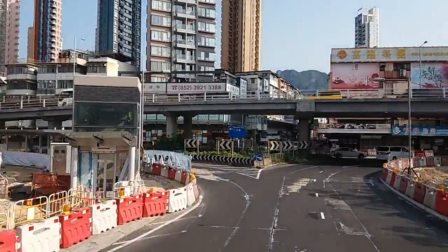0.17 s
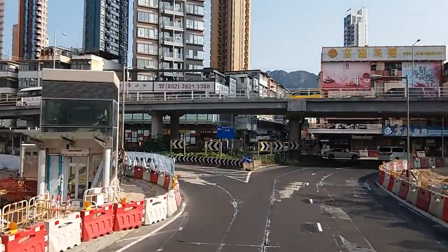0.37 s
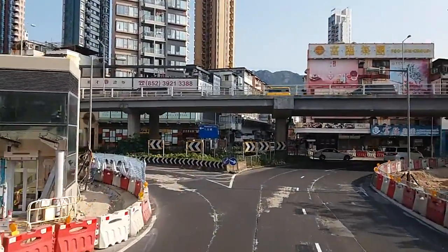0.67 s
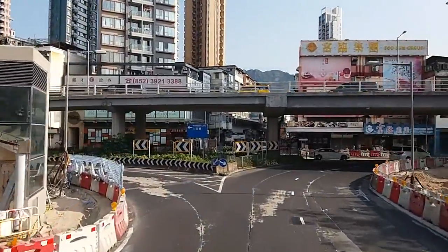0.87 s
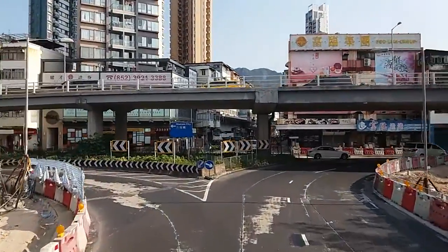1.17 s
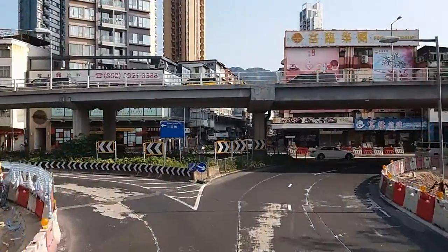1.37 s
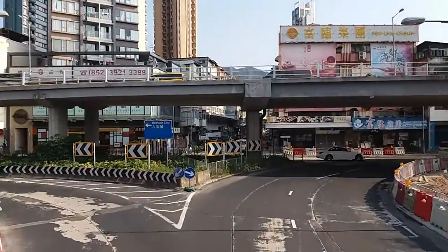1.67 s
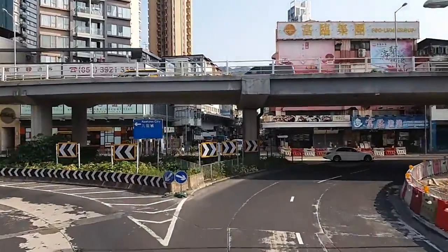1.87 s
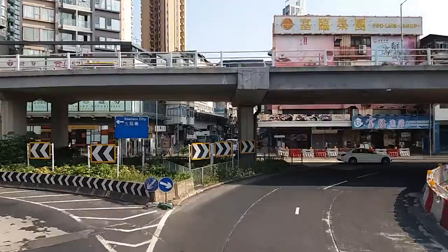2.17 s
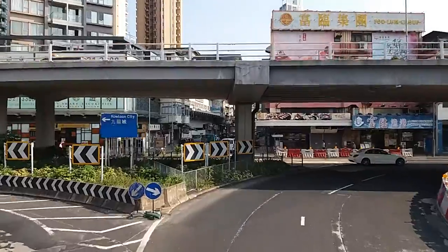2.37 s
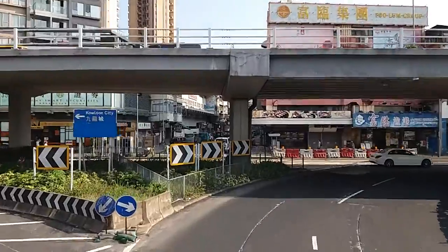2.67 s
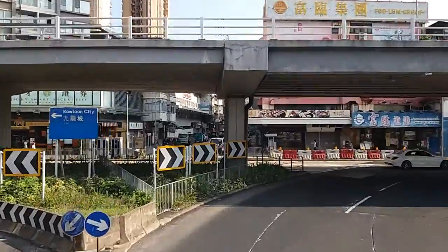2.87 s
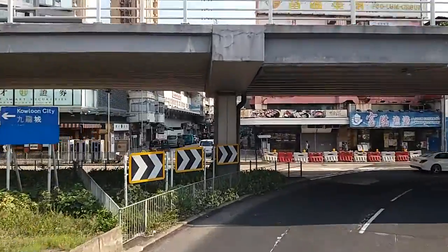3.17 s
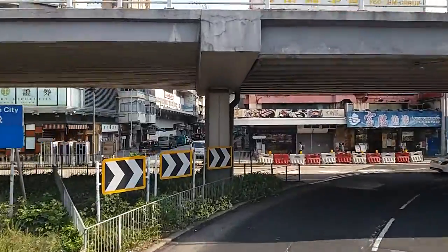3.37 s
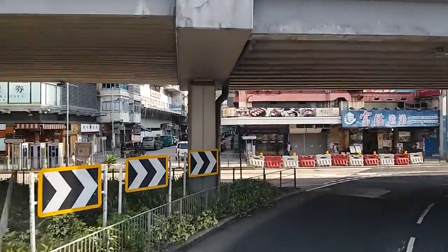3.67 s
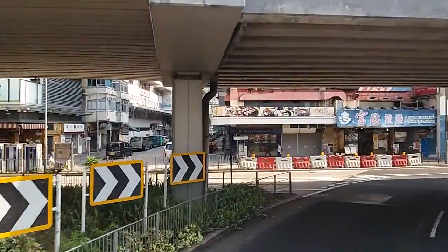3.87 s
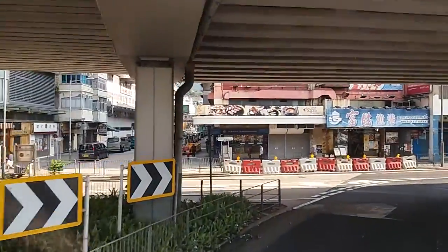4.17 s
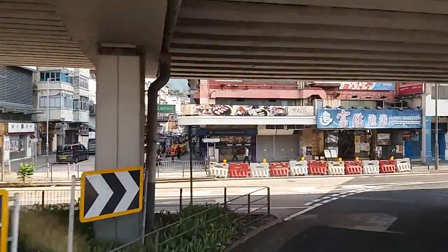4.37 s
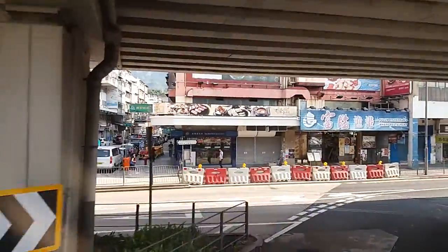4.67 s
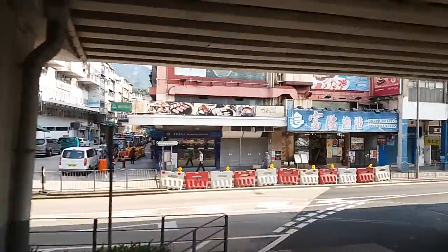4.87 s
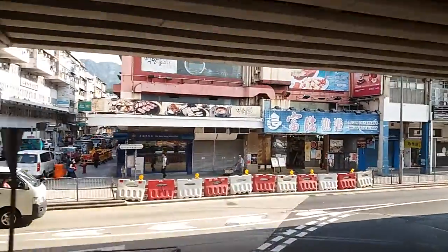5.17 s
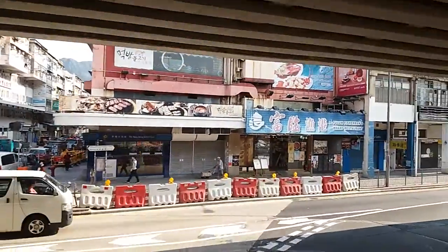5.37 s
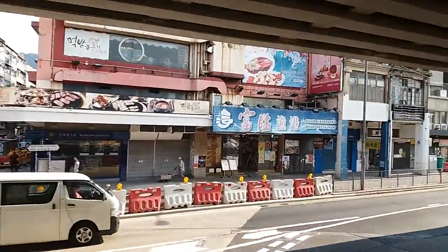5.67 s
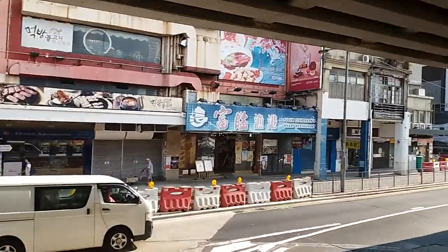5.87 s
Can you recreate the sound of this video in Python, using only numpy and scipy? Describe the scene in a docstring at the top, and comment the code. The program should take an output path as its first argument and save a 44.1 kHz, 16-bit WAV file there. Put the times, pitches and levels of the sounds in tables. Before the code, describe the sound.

Interior of a large bus on an uneven city road, in close, wide stereo. From 0 s a deep engine boom, tyre thrum, rumble and a low steady gear whine fill the cabin, with buzzing trim and faint air hiss. Floor thuds land at about 0.1 and 0.3-0.5 s, a heavy one near 1 s and another at 1.55 s, setting a side panel humming. The boom fades by 1.8 s; a sharp tick snaps at 2.0 s. Around 2.8 s a brief high rubbery squeak. The whine climbs from 3.2 to 4.15 s, then slides down to the end, swelling near 5.2 s. Thuds at 3.6, 4.1 and 4.5 s, a tick at 3.9 s. From 4.7 s fittings clack more densely, with crisp ticks at 4.9, 5.1 and 5.9 s and hard metallic raps at 5.65 and 5.8 s. The rumble continues to 6 s.

```python
"""The upper deck of a large bus in a city, heard through two microphone ports.
Shaped noise makes the road's thrum, rumble and drone, the buzz of the trim and the hiss of the air vents.
Drifting sine waves make the engine boom, the gear whine and a humming side panel.
Resonances struck by short bursts make the floor thuds and the clacks of loose fittings; fading sine waves
make the ticks of a clip and the rings of a bracket. One joint squeaks once, as noise through resonances."""
import sys
import numpy as np
from scipy import signal
from scipy.fft import rfft, irfft, next_fast_len
from scipy.io import wavfile
from scipy.ndimage import uniform_filter1d, minimum_filter1d, map_coordinates

SR = 44100
rng = np.random.default_rng(int(sys.argv[2]) if len(sys.argv) > 2 else 0)


def to_wav(s):
    """Save 16-bit WAV."""
    ch = np.atleast_2d(s).T  # columns
    pcm = np.round(np.clip(ch, -1, 1) * 32767)  # PCM
    wavfile.write(sys.argv[1], SR, pcm.astype(np.int16))


N = 265217  # length in samples, about 6 s

# gear teeth meshing: (time [s], pitch [Hz], level [dB])
MESH = [(0, 216.9, -28), (.3, 217, -29), (.6, 217.3, -31.5), (1.2, 220.2, -29.5), (2, 217, -32.5),
        (2.55, 211.1, -26), (2.9, 210.7, -27), (3.17, 216.7, -28.5), (3.4, 230, -22.5),
        (3.57, 241.4, -35.5), (3.68, 244, -25.5), (3.76, 248, -32.5), (3.83, 253.2, -45),
        (3.98, 260.3, -38.5), (4.15, 265, -33.5), (4.45, 261.5, -28.5), (4.6, 256.7, -43.5),
        (4.8, 255.3, -37), (4.86, 250.8, -25), (4.97, 250, -33.5), (5.21, 244.4, -21), (5.45, 239.2, -29),
        (5.75, 234.1, -27.5), (6.02, 227.6, -23.5)]
# resonances of the floor panels: (pitch [Hz], width [Hz], level [dB])
FLOOR_MODES = [(208, 99, -15.5), (254, 46, -0.5), (365, 21.6, 2), (442.5, 26, 1), (519.6, 20, 2),
               (645, 37, 0.5), (867, 244, -6), (1080, 300, -11.5)]


def amp(db):
    """Turn decibels into a plain multiplier."""
    return 10 ** (np.asarray(db) / 20)


def unit(x):
    """Scale a signal to an rms of 1."""
    return x / np.sqrt(np.mean(x ** 2) + 1e-20)


def along(points, hz):
    """Read values between (frequency [Hz], value) points on a log frequency axis."""
    f, v = np.transpose(points)
    return np.interp(np.log(hz + 1), np.log(f + 1), v)


def curves(rows):
    """One value per sample for each column after the time."""
    s, *cols = np.transpose(rows)
    return [np.interp(np.arange(N) / SR, s, c) for c in cols]


def during(rows, fade):
    """1 between the first and last row, fading to 0 outside over fade seconds."""
    start, end = rows[0][0], rows[-1][0]
    return np.interp(np.arange(N) / SR, [start - fade, start, end, end + fade], [0, 1, 1, 0])


def wobble(rate):
    """A smooth random curve with rate random points a second."""
    knots = rng.standard_normal(int(N * rate / SR) + 4)
    return map_coordinates(knots, [np.arange(N) * rate / SR])


def filtered(x, response):
    """Colour x by a response that depends on frequency."""
    m = next_fast_len(x.shape[-1] + 8192)
    spectrum = rfft(x, m) * response(np.fft.rfftfreq(m, 1 / SR))
    return irfft(spectrum, m)[..., :x.shape[-1]]


def modes(table):
    """The response of resonances (pitch [Hz], width [Hz], level [dB]), with alternating signs."""
    def response(f):
        return sum((-1) ** k * amp(db) * 1j * f * w / (c * c - f * f + 1j * f * w)
                   for k, (c, w, db) in enumerate(table))
    return response


def diffuse(pair):
    """Mix two signals as the cabin's sound field reaches the ports: the first in step, the second opposed."""
    # how alike left and right are: (frequency [Hz], likeness [-1 to 1])
    likeness = [(60, 0.86), (99, 1), (160, 0.99), (270, 0.77), (450, 0.84), (740, 0.084), (1220, -0.72),
                (2010, 0.091), (3330, -0.0078), (5500, -0.022), (9080, 0.03), (15000, 0.06)]

    def shares(hz):
        turn = np.arccos(np.clip(along(likeness, hz), -1, 1)) / 2
        return np.array([np.cos(turn), np.sin(turn)])
    mid, side = filtered(pair, shares)
    return np.array([mid + side, mid - side])


def rush(spectrum, patchy_db):
    """Two noises with an rms of 1 together, sharing patches of random gain in time and frequency."""
    z = signal.stft(rng.standard_normal((2, N)), nperseg=512)[2]
    field = uniform_filter1d(rng.standard_normal(z.shape[1:]), size=8, axis=0)
    field = uniform_filter1d(field, size=8, axis=1)
    pair = signal.istft(z * amp(patchy_db * unit(field)), nperseg=512)[1][:, :N]
    return unit(filtered(pair, lambda hz: amp(along(spectrum, hz))))


def tone(hz, db, drift, rate):
    """A sine of rms level db whose phase wanders by about drift radians."""
    return np.sqrt(2) * amp(db) * np.sin(2 * np.pi * np.cumsum(hz) / SR + drift * wobble(rate))


def fittings():
    """Trim buzzes in quick tiny shakes; the air hiss swells with it."""
    # how hard the cabin shakes: (time [s], trim buzz level [dB], hiss level [dB])
    shake_levels = [(0, -37, -46.5), (.33, -39.5, -46), (.79, -44, -51), (.95, -41.5, -48.5),
                    (1.2, -40.5, -46), (1.27, -43.5, -52), (1.72, -48, -58), (2.03, -40.5, -48),
                    (2.24, -44.5, -55), (2.65, -47, -57), (2.96, -45.5, -57), (3.33, -47.5, -60.5),
                    (3.6, -45.5, -56), (4.71, -45, -56.5), (4.81, -47, -57.5), (5.29, -40.5, -52.5),
                    (5.41, -44, -54), (5.58, -46, -55), (5.8, -40.5, -51), (6.01, -41.5, -54)]
    # colour of the buzz: (frequency [Hz], level [dB])
    buzz_colour = [(650, -14.5), (1100, -6.5), (1420, -12), (1780, -6.5), (2100, -10), (2160, -7.5),
                   (2330, -11.5), (3210, -11), (4360, -21), (6000, -27.5), (7800, -44), (13200, -120)]
    # colour of the hiss: (frequency [Hz], level [dB])
    hiss_colour = [(2350, -53), (4000, -2.5), (4600, -8), (6290, -6), (7500, -4), (8600, -3.5),
                   (9800, -10.5), (11000, -11), (13200, -14.5), (15700, -20)]
    buzz_db, hiss_db = curves(shake_levels)
    # about 30 shakes a second of random strength, each falling 60 dB in 0.12 s
    kicks = amp(12.6 * rng.random(N)) * (rng.random(N) < 30 / SR)
    fall = amp(-60 * np.arange(4000) / SR / 0.12)
    shaking = unit(0.78 + 0.11 * signal.fftconvolve(kicks, fall)[:N])
    # one strip sings at its own pitch
    strip = unit(filtered(rng.standard_normal((2, N)), modes([(2214, 78, 0)])))
    buzz = amp(buzz_db) * (rush(buzz_colour, patchy_db=0.96) + amp(-11.0) * strip)
    hiss = amp(hiss_db) * rush(hiss_colour, patchy_db=0.7)
    return shaking * (buzz + hiss)


def heaving():
    """The body heaves over dips, moving the thrum and rumble levels up or down in dB."""
    # (time [s], thrum rise [dB], rumble rise [dB])
    heaves = [(.17, 0, 3.5), (.37, 3, 6.5), (.55, 10, 4), (.8, -1, 7.5), (.9, -1, 5), (1.2, -12, 4.5),
              (1.56, 0, 3.5), (1.92, 8.5, 5), (2.04, 10.5, 4), (2.49, 13, 3.5), (2.65, 1.5, -3),
              (2.85, -1, 5.5), (3.3, 7, 0), (3.55, 6.5, 5.5), (3.9, 1, 0), (4.09, -0.5, 3.5), (4.2, 6, 2),
              (4.5, 7, 1.5), (4.7, 5.5, 3), (4.85, -4.5, -0.5), (5.1, 10.5, 4), (5.3, -2, 4.5),
              (5.61, -1, -1.5), (5.85, 9, 7)]
    rise_s, fall_s = 0.039, 0.071
    s, *rises_db = np.transpose(heaves)
    t = np.arange(0, N / SR, 0.004)
    away = t - s[:, None]
    bump = np.exp(-(away / np.where(away < 0, rise_s, fall_s)) ** 2)
    return curves(np.transpose([t, *(np.array(rises_db) @ bump)]))


def panel():
    """Jolts set a side panel humming in three modes of wandering phase."""
    # jolts: (time [s], level [dB])
    jolts = [(0.079, -18), (0.385, -17.5), (.44, -24), (.48, -28), (.65, -25), (.97, -19.5), (1.099, -23),
             (1.58, -21)]
    # pitches of the three modes [Hz]
    pitches = (378.5, 415, 513)
    rise_s, t60_s = 0.006, 0.33  # t60: time to fall by 60 dB
    s, jolt_db = np.transpose(jolts)
    t = np.clip(np.arange(2 * SR) / SR - s[:, None], 0, None)
    swells = amp(jolt_db[:, None] - 60 * t / t60_s) * (1 - np.exp(-t / rise_s))
    level = np.pad(np.sum(swells, axis=0), (0, N - 2 * SR))
    hum = [sum(tone(np.full(N, hz), db, drift=0.9, rate=28) for hz, db in zip(pitches, (-3, -7, -9)))
           for port in "LR"]
    return level * np.array(hum)


def road():
    """Rough tarmac drives thrum from the tyres, rumble from the suspension and drone from the body."""
    # roughness of the tarmac, as the level of the body drone: (time [s], level [dB])
    roughness = [(0, -24.5), (.35, -24.5), (.7, -28), (1, -25.5), (1.7, -31.5), (2.04, -27.5), (3.1, -31.5),
                 (3.9, -29.5), (4.15, -29.5), (5, -29), (6.01, -30)]
    # colour of the thrum: (frequency [Hz], level [dB])
    thrum_colour = [(20, -60), (32, -33), (42, -2.5), (52, 1), (62, 4), (80, 7), (100, 1.5), (125, -29),
                    (170, -61), (300, -120)]
    # colour of the rumble: (frequency [Hz], level [dB])
    rumble_colour = [(50, -52), (75, -4.5), (100, -1.5), (125, -1.5), (157, -3), (190, -5), (236, -9.5),
                     (300, -24.5), (390, -40), (660, -120)]
    # colour of the drone: (frequency [Hz], level [dB])
    drone_colour = [(100, -24), (170, -7), (227, -16), (279, -6.5), (381, -7), (519, -6.5), (669, -7.5),
                    (728, -8), (1170, -18.5), (1290, -24.5), (1600, -35), (2080, -53), (3520, -120)]
    drone_db, = curves(roughness)
    rough_db = drone_db - drone_db.mean()
    thrum_up_db, rumble_up_db = heaving()
    # level on average tarmac, plus the growth in dB per dB of roughness
    thrum_db = -29 + 0.52 * rough_db + thrum_up_db
    rumble_db = -27.5 + 1.36 * rough_db + rumble_up_db
    thrum = amp(thrum_db) * rush(thrum_colour, patchy_db=-0.9)
    rumble = amp(rumble_db) * rush(rumble_colour, patchy_db=0.75)
    drone = amp(drone_db + 0.7 * wobble(9)) * rush(drone_colour, patchy_db=1.1)
    return thrum + rumble + drone + panel()


def boom():
    """The engine's firing rate drives the lowest air mode of the long cabin until the load drops."""
    # (time [s], level [dB])
    boom_levels = [(0, -13), (.2, -22), (.6, -17.5), (.95, -18.5), (1.3, -20.5), (1.42, -27), (1.6, -25),
                   (1.75, -33)]
    mesh_per_firing = 4
    firing_hz = curves(MESH)[0] / mesh_per_firing
    return tone(firing_hz, curves(boom_levels)[0], drift=0.12, rate=5) * during(boom_levels, fade=0.1)


def whine():
    """Gear teeth mesh at a rate tied to the engine; standing waves shift it between the ports."""
    # a tone at half the mesh rate swells once: (time [s], level [dB])
    half_levels = [(4.3, -56), (4.65, -44), (5.2, -26), (5.45, -38), (5.7, -48)]
    octave_db = -39.5  # before the floor's resonances colour it
    pan_db = 3 + 2.5 * wobble(3.84)  # left over right
    hz, db = curves(MESH)
    mesh = tone(hz, db, drift=0.08, rate=6)
    octave = np.abs(modes(FLOOR_MODES)(2 * hz)) * tone(2 * hz, octave_db, drift=1.5, rate=35)
    half = tone(hz / 2, curves(half_levels)[0], drift=0.66, rate=10) * during(half_levels, fade=0.2)
    return (mesh + octave + half) * amp(0.5 * np.array([pan_db, -pan_db]))


def squeak():
    """Rubber slides on metal: friction noise swells, lets go, and rings on in the joint's resonances."""
    # resonances of the joint: (pitch [Hz], width [Hz], level [dB])
    joint = [(3085, 32, 9), (3262, 45, 6), (3500, 200, -4), (3846, 30, 3), (4280, 35, 1), (7620, 60, -7),
             (8250, 500, -11), (8975, 40, -6), (9270, 110, -2), (9444, 30, -6), (9612, 40, -5),
             (9947, 30, -5), (10400, 200, -9), (11300, 500, -17)]
    start_s, rise_s, hold_s, t60_s = 2.827, 0.011, 0.033, 0.06
    linger_db, linger_t60_s = -4.5, 0.3  # the cabin carries the squeak on
    t = np.clip(np.arange(N) / SR - start_s, 0, None)
    after = np.clip(t - hold_s, 0, None)
    fall = amp(-60 * after / t60_s) + amp(linger_db - 60 * after / linger_t60_s)
    level = amp(-35.5) * (1 - np.exp(-(t / rise_s) ** 2)) * fall

    def grit_colour(f):
        return modes([(4000, 3400, 0)])(f) ** 2 + modes([(9300, 4500, -1)])(f) ** 2
    grit = unit(filtered(rng.standard_normal((2, N)), grit_colour))
    friction = rng.standard_normal((2, N))
    ring = filtered(level * friction, modes(joint)) / filtered(friction, modes(joint)).std()
    scrape = amp(-12) * level * grit  # broad grit under the squeak
    return filtered(ring + scrape, lambda f: 1 / (1 + (f / 12300) ** 12))


def ticks():
    """A clip snaps with a short ping and rebounds; windows and seats scatter it back."""
    # snaps: (time [s], level [dB])
    snaps = [(2.0043, -16.5), (3.046, -31), (3.273, -30.5), (3.8835, -18), (3.9165, -33), (4.0277, -28),
             (4.8775, -14), (4.897, -30), (5.1348, -13.5), (5.153, -32), (5.922, -16)]
    # modes of a plastic clip on the hand rail: (pitch [Hz], level [dB], time to fall 60 dB [s])
    clip_modes = [(3290, -1.5, 0.0083), (2981, -19, 0.018), (5950, -6.5, 0.0043)]
    rebound_s, rebound_db, rebound_sag = 0.0045, -8, 0.94  # lands again, softer and lower
    lean_db = -3  # left over right
    out, t = np.zeros((2, N + SR)), np.arange(SR // 5) / SR
    for s, db in snaps:
        bend = 1 + 0.015 * rng.standard_normal()  # pitch scatter from snap to snap
        ping = sum(amp(level_db - 60 * t / t60) * np.sin(2 * np.pi * bend * hz * t)
                   for hz, level_db, t60 in clip_modes)
        ping = ping * (1 - np.exp(-t / 0.00073))
        late = np.clip(t - rebound_s, 0, None)
        ping = ping + amp(rebound_db) * np.interp(rebound_sag * late, t, ping)
        # mostly the first cycles scatter back
        first_cycles = ping * amp(-60 * t / 0.012)
        scatter = amp(-21 - 60 * t / 0.15) * (t > 0.003) * rng.standard_normal((2, len(t)))
        heard = ping + signal.fftconvolve(scatter, first_cycles[None], axes=1)[:, :len(t)]
        out[:, round(s * SR):][:, :len(t)] += amp(db) * amp([[lean_db / 2], [-lean_db / 2]]) * heard
    return out[:, :N]


def raps():
    """The hardest contacts rap a bracket, which rings for a few milliseconds."""
    # (time [s], level of the first, second and third mode [dB])
    hits = [(5.6455, -40, -31, -45), (5.6644, -23, -25, -36), (5.6654, -27, -27, -29),
            (5.7928, -13, -20, -26)]
    # modes of the bracket: (pitch [Hz], time to fall 60 dB [s])
    bracket = [(1950, .006), (4300, .006), (9000, .006)]
    out, t = np.zeros(N + SR), np.arange(SR // 20) / SR
    for s, *levels_db in hits:
        out[round(s * SR):][:len(t)] += sum(amp(db - 60 * t / t60) * np.sin(2 * np.pi * hz * t)
                                            for db, (hz, t60) in zip(levels_db, bracket))
    return out[:N]


def clacks():
    """Each loose contact snaps and fills the cabin with a short tail that differs per port."""
    # (time [s], level [dB], treble over body before filtering [dB], time for the body tail to fall 60 dB [s])
    contacts = [(.251, -32, -11, .12), (0.3374, -19, -18, 0.13), (0.4338, -31.5, -14.5, 0.24),
                (0.526, -28.5, -14, 0.11), (0.8182, -30.5, -29, 0.085), (0.9176, -26, -14.5, 0.1),
                (.983, -34, -14, .12), (1.154, -34, -14, .1), (1.25, -34, -12, 0.11), (1.33, -47, -2, .126),
                (1.5006, -31.5, -16.5, 0.52), (1.5747, -33, -12, 0.55), (1.6153, -38, -7, 0.17),
                (1.623, -38, -8, .06), (1.724, -36, -14, 0.38), (1.8617, -24, -17, 0.088),
                (1.909, -24.5, -12, 0.17), (2.457, -39, -3, .078), (2.511, -32, -17, 0.31),
                (2.634, -34, -15.5, 0.38), (3.598, -29.5, -21, .11), (3.659, -31, -19, 0.38),
                (3.882, -37.5, -7, 0.15), (3.9935, -50, 0, 0.2), (4.13, -41, -5, .1),
                (4.1377, -31.5, -20, 0.1), (4.343, -44, -4, 0.16), (4.37, -39, -8.5, .1),
                (4.419, -33, -12.5, 0.64), (4.708, -25.5, -17, 0.2), (4.786, -30, -19.5, 0.25),
                (4.8437, -29, -24, 0.13), (4.8677, -33, -12, .2), (4.8753, -30.5, -14, 0.39),
                (5.127, -26, -12, 0.28), (5.229, -23, -14.5, 0.17), (5.301, -34, -11, .16),
                (5.3196, -22, -17, 0.1), (5.3953, -26.5, -19, 0.091), (5.5562, -35.5, -6, 0.055),
                (5.5698, -25, -24, 0.077), (5.647, -26, -21, 0.14), (5.6645, -16.5, -16.5, 0.1),
                (5.684, -27, -20, 0.087), (5.74, -35, -9, 0.13), (5.7922, -14, -27, 0.13),
                (5.7995, -20.5, -33, .1), (5.806, -24, -30, .12), (5.9198, -28, -13, 0.21)]
    low, high, edge = np.zeros((3, 2, N + SR))
    t = np.arange(SR // 3) / SR
    for s, db, treble_db, t60 in contacts:
        pan_db = rng.normal(0, 1)  # random left-right scatter
        side = amp([[pan_db / 2], [-pan_db / 2]])
        at = slice(round(s * SR), round(s * SR) + len(t))
        hard_db = -10.5 + 0.45 * max(db + 25, 0)  # strong contacts snap harder
        crack = amp(hard_db + 4 - 60 * t / 0.011) * rng.standard_normal(len(t))
        crack[0] = amp(hard_db + 16)
        tail = amp(-60 * t / t60) * (1 - np.exp(-t / 0.0018)) * rng.standard_normal((2, len(t)))
        # a contact chatters: its tail comes in lumps, one random level each 1.5 ms
        lumps = np.interp(t, np.arange(400) * 0.0015, rng.standard_normal(400))
        tail = tail * amp(2.5 * lumps - 2.5)
        low[:, at] += amp(db - 5.5) * side * (crack + tail)
        high[:, at] += amp(db + treble_db) * side * (0.88 * crack + tail * amp(-60 * t / 2.1))
        # a bright edge, stronger still on hard contacts
        spark_db = db - 22 + 0.55 * max(db + 21.0, 0) - 60 * t / 0.015
        edge[:, at] += amp(spark_db) * side * rng.standard_normal(len(t))

    def body_colour(f):
        narrow = modes([(1940, 150, 6)])(f) + modes([(2215, 100, 6)])(f)
        broad = modes([(1880, 2170, 5), (4200, 2600, 2)])(f)
        return narrow + broad / (1 + (f / 10500) ** 4)
    low = filtered(low, body_colour)
    high = filtered(high, modes([(5830, 1000, -34), (7900, 2370, 9.5)]))
    edge = filtered(edge, modes([(9100, 1500, 2), (13000, 5000, -7)]))
    return (low + high + edge)[:, :N]


def thuds():
    """A bump jolts the floor: one blow with a pitched knock, then a shudder dying away."""
    # (time [s], level [dB], time for the shudder to fall 60 dB [s], brightness [dB per octave],
    #  blow over the level [dB], knock level before its shape [dB], knock pitch [Hz])
    bumps = [(.081, -15.5, 0.14, -5, 37, -27, 412), (.252, -25, .19, 17, 24, -32, 185),
             (0.301, -16, .1, -8, 31, -14, 200), (.315, -17, .088, 7, 35, -18, 215),
             (.383, -8.5, 0.16, -.5, 35.5, -15, 385), (.408, -12, .2, -3, 37, -15, 427),
             (.481, -9, .12, -4, 32, -22, 390), (.958, -5, 0.25, 1, 36, -21, 590),
             (.964, -9.5, 0.18, 1, 35, -14.5, 328), (0.976, -6.5, 0.29, 1, 25, -11.5, 434),
             (1.548, -8, 0.19, 0.5, 34, -14, 260), (1.556, -8.5, 0.29, 0, 33, -14.5, 240),
             (1.566, -8, 0.31, 1.5, 29, -15, 410), (1.897, -28, .14, -4, 32, -29, 185),
             (2.312, -33, .1, 0, 31, -28, 185), (2.634, -23, .1, 0, 35, -28, 185),
             (3.607, -10, .63, -5.5, 29, -24, 185), (4.084, -11.5, 0.22, 0.5, 37, -13, 209),
             (4.095, -16, .2, 7, 26, -15, 217), (4.105, -16, .2, 0, 35, -21, 530),
             (4.121, -20, .11, 4, 38, -29, 493), (4.5, -10, 0.17, -1, 30, -16.5, 185),
             (5.665, -21.5, .15, 16, 30, -26, 185), (5.793, -9.5, .25, 4, 29, -37, 185)]
    soft_hz = 1510  # rubber mounts soften what lies above
    out, t = np.zeros((2, N + SR)), np.arange(SR // 2) / SR
    # the part of the floor that gives way: rises in 2 ms, falls 60 dB in 60 ms
    knock = -amp(5.0 - 60 * t / 0.06) * (1 - np.exp(-t / 0.002))
    for s, db, t60, tilt_db, blow_db, knock_db, knock_hz in bumps:
        jolt = amp(db + 5 - 60 * t / t60) * rng.standard_normal((2, len(t)))
        jolt[0, 0] = -amp(db + blow_db)

        def colour(f):
            # where the bump lands tilts the colour
            tilt = amp(tilt_db * np.log2(np.clip(f, 150, 1300) / 450))
            return modes(FLOOR_MODES)(f) * tilt / (1 + 1.4j * f / soft_hz - (f / soft_hz) ** 2)
        out[:, round(s * SR):][:, :len(t)] += filtered(jolt, colour)
        out[0, round(s * SR):][:len(t)] += amp(knock_db) * knock * np.sin(2 * np.pi * knock_hz * t)
    return out[:, :N]


def scene():
    """Body noise reaches the ports as a diffuse field, the other sources directly."""
    body = diffuse(fittings() + road() + thuds())
    return body + boom() + whine() + squeak() + ticks() + raps() + clacks()


def record(dry):
    """Colour each port, cut the deepest bass, limit the peaks and keep nothing above the band limit."""
    # the two ports colour differently: (frequency [Hz], left over right [dB])
    port_colour = [(60, -4), (140, -2), (210, 0), (330, -3.5), (500, 1), (850, -4), (1350, -1.5),
                   (1700, 3.5), (2300, -1), (2650, -0.5), (4100, -2.5), (5700, -7.5), (6900, -4.5),
                   (7700, -5.5), (8600, 11), (9600, 10.5), (10200, 6), (12500, 2), (15000, -1)]
    ceiling, hold, top_hz = 0.88, 441, 15800  # peak limit, smoothing of its gain [samples], band limit

    def response(hz):
        bass_cut = (hz / 40) ** 3 / np.sqrt(1 + (hz / 40) ** 6)
        return amp(np.array([[0.5], [-0.5]]) * along(port_colour, hz)) * bass_cut
    x = filtered(dry, response)
    needed = ceiling / np.maximum(np.abs(x).max(axis=0), ceiling)
    # the gain starts to fall ahead of each peak and is held around it
    gain = uniform_filter1d(minimum_filter1d(needed, size=2 * hold), size=hold)
    return filtered(gain * x, lambda hz: hz < top_hz)


dry = scene()
out = record(dry)
to_wav(out)
```